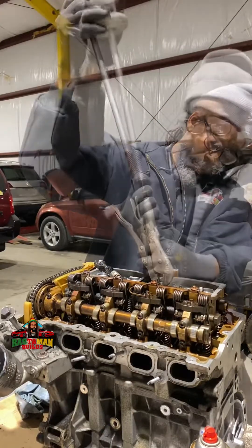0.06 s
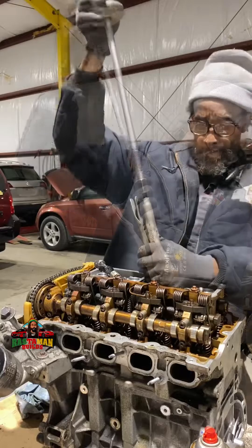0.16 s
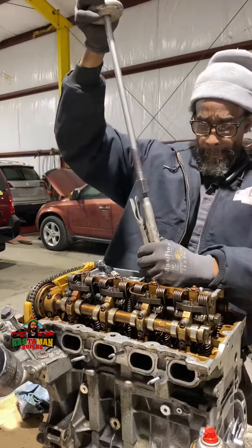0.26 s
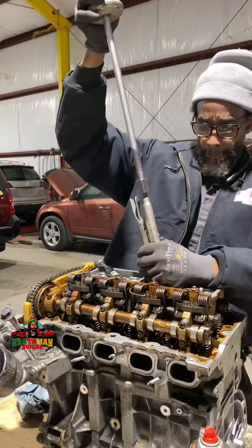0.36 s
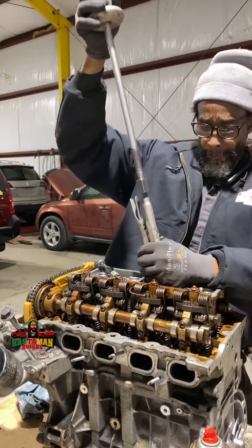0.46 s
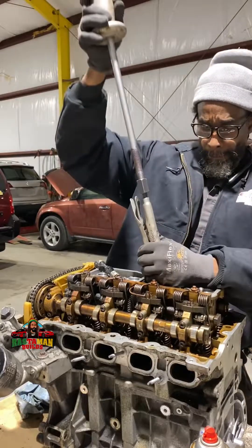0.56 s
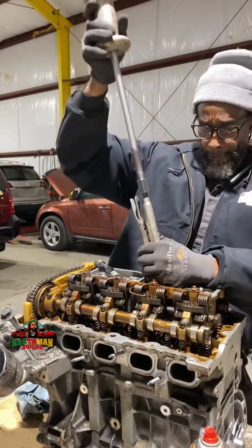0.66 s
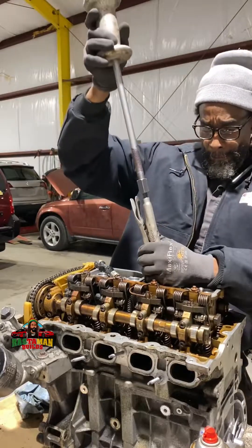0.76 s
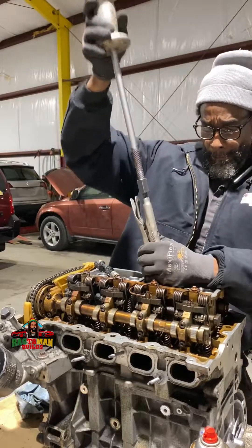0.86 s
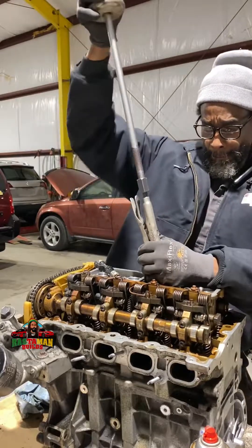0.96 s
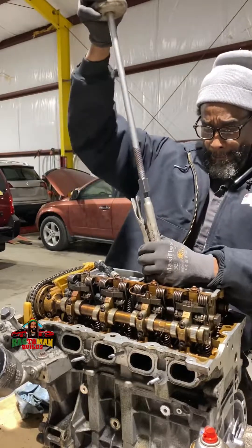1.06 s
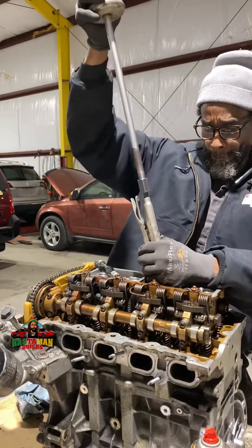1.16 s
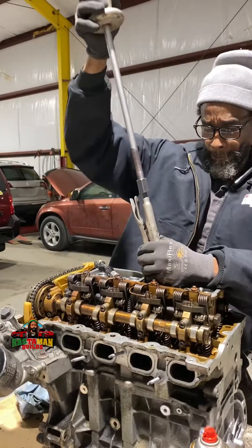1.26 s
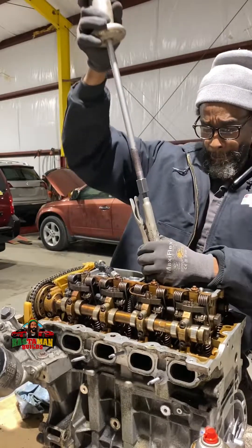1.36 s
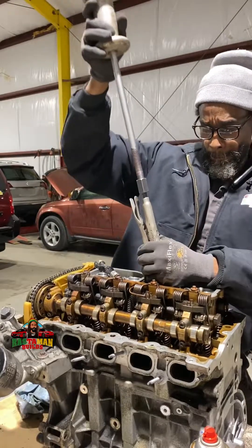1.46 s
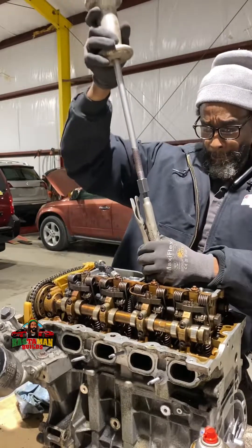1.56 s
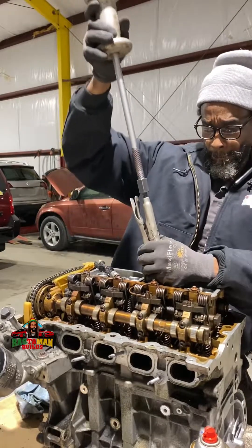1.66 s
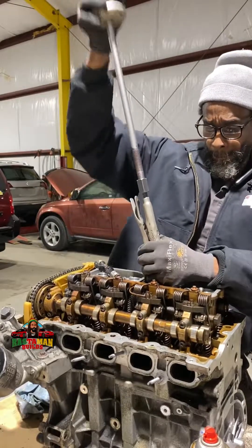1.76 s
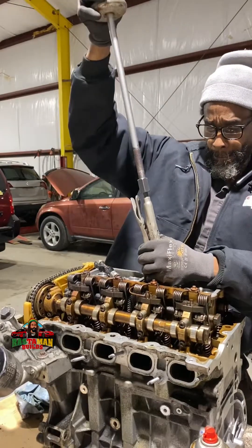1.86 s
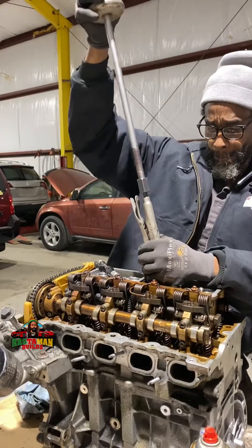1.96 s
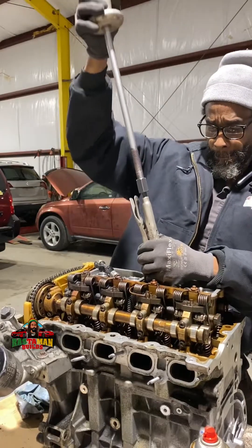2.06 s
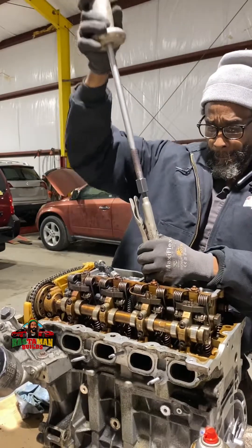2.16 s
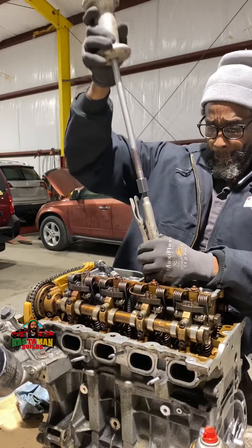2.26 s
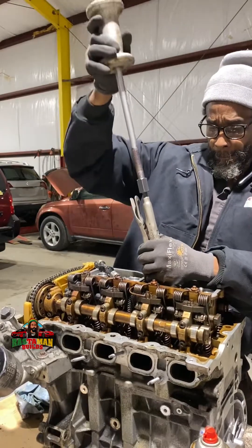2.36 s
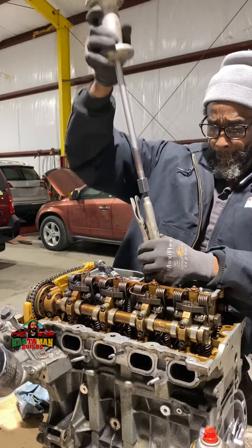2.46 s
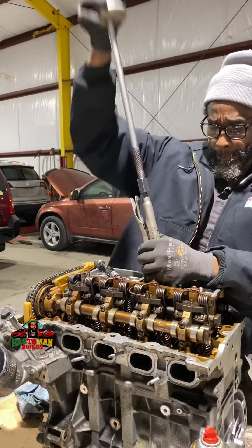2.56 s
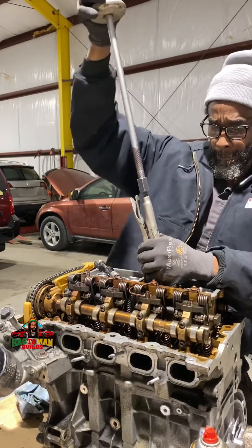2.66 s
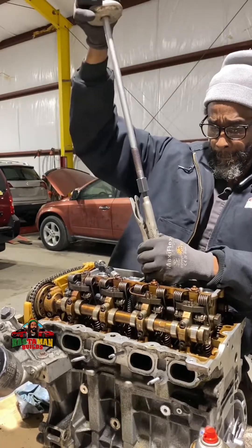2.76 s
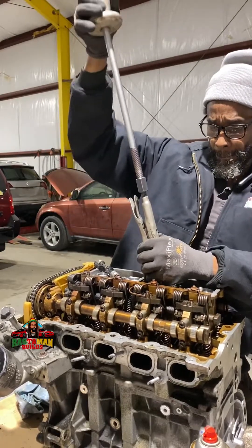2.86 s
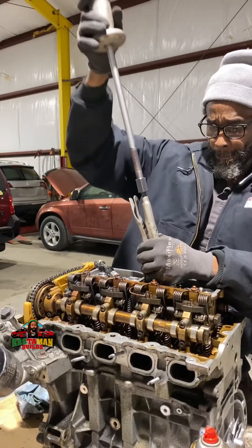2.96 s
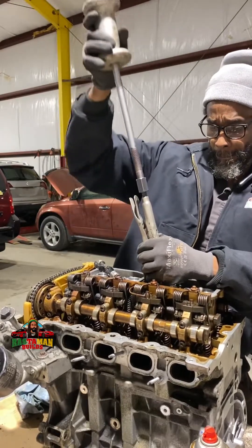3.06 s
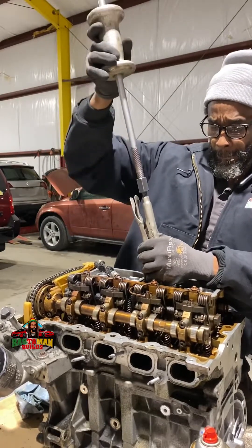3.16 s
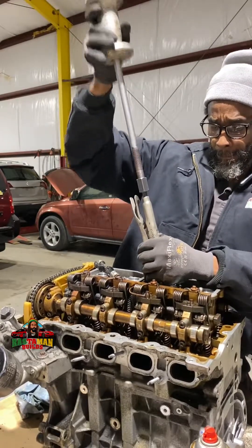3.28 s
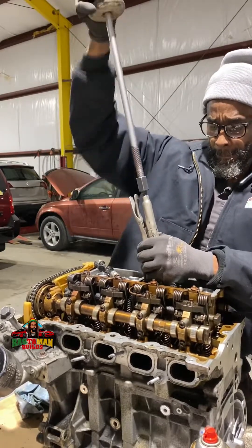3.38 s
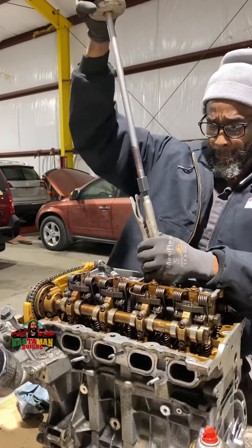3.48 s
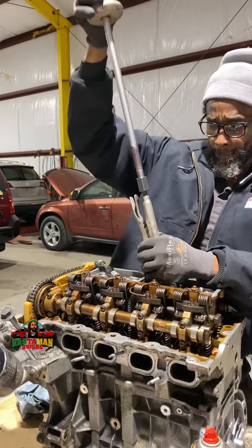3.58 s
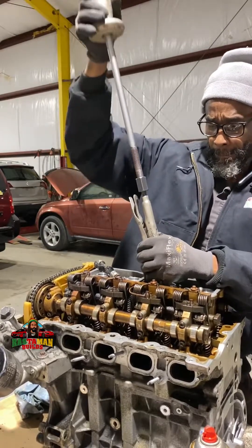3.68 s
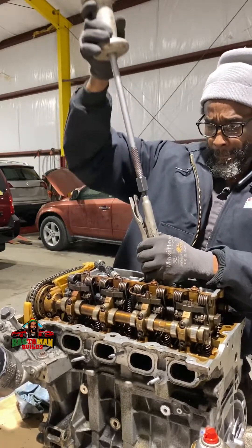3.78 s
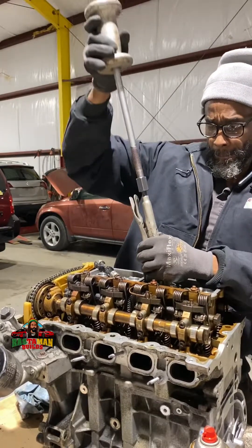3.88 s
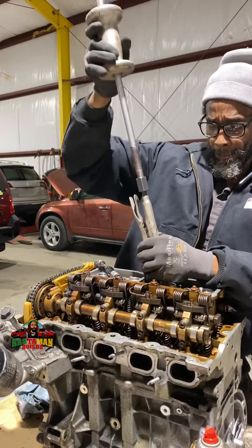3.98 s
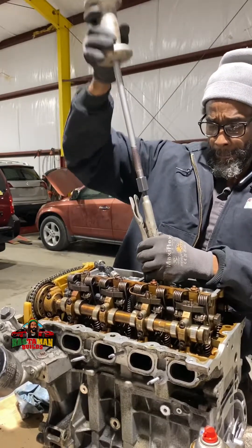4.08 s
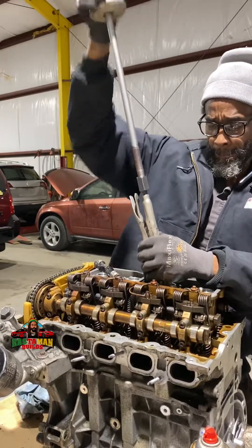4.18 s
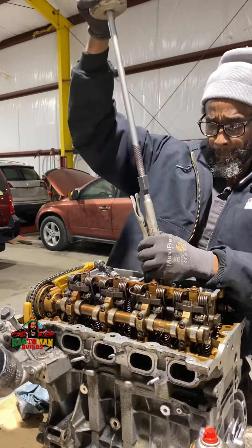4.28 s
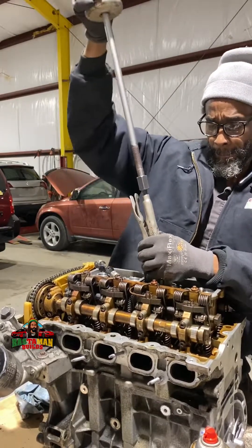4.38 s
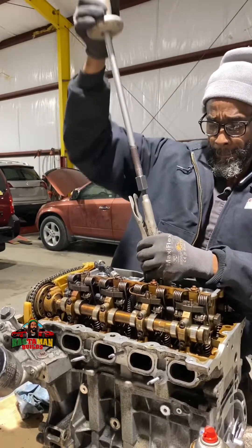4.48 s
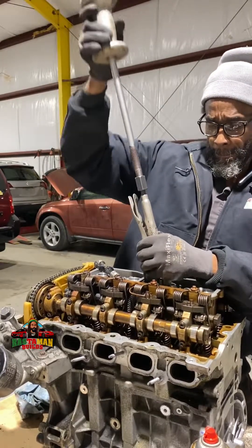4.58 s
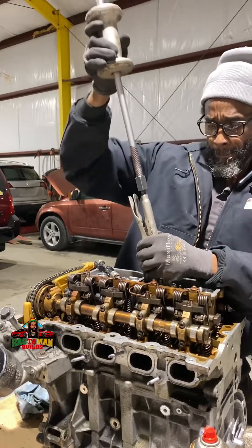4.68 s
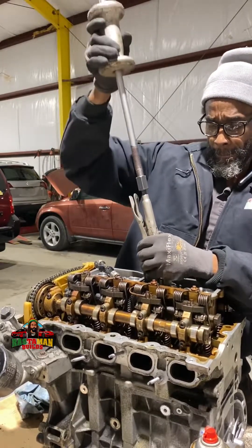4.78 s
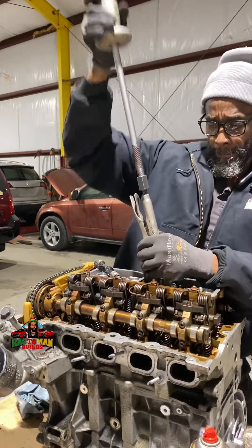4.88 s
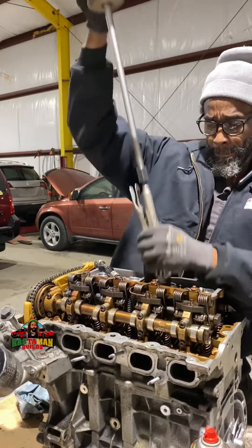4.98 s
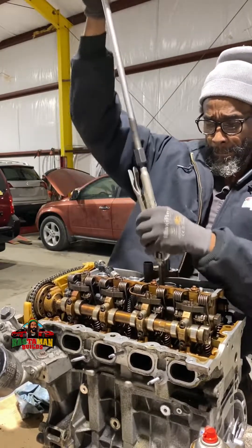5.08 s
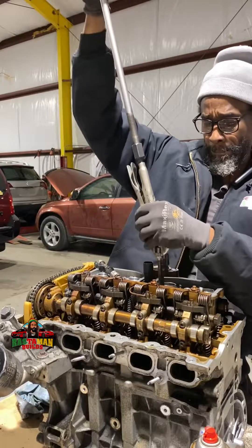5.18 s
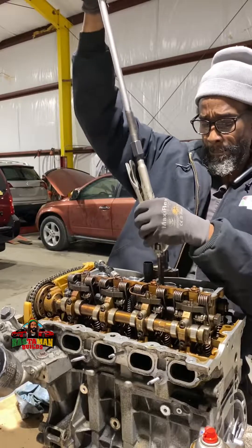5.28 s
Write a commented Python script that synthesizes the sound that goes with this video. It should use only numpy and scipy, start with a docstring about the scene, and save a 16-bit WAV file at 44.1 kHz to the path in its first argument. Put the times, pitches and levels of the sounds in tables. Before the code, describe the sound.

A slide hammer pulls at an engine, heard close up with a faint workshop echo. A steel weight scrapes briefly up its rod and slams into the stop at about 0.2 seconds with a sharp, bright clack and a very short ring. The blow repeats steadily and somewhat louder at about 0.9, 1.8, 2.6, 3.4, 4.2 and 4.9 seconds. Each slam carries a small clank and a dull thump from the engine. After each one the weight slides back down with a soft metallic scrape and scattered light clinks, and now and then the pliers jangle faintly. Underneath, the swaying engine stand gives a quiet low rumble and soft knocks that swell and fade between strokes. Right after the last slam, around 5 seconds, loose metal clatters briefly, followed by a few small clinks until about 5.3 seconds.

```python
"""A slide hammer, heard close up in a large workshop. Seven times a steel weight scrapes up its rod,
touches the stop and slams home, jolting the pliers and the engine below; then it slides back, clinking.
Underneath, the engine rumbles and knocks on its swaying stand. The microphone has two ports a few
centimetres apart, the left one hearing it all slightly earlier, with a faint room tail behind."""
import sys
import numpy as np
from scipy import signal
from scipy.fft import rfft, irfft, next_fast_len
from scipy.io import wavfile
from scipy.ndimage import uniform_filter1d

SR = 44100
rng = np.random.default_rng(int(sys.argv[2]) if len(sys.argv) > 2 else 0)


def master(y):
    """Save y as 16-bit WAV."""
    cut = np.clip(np.atleast_2d(y).T, -1, 1)
    pcm = np.round(cut * 32767)  # scale
    wavfile.write(sys.argv[1], SR, pcm.astype(np.int16))


N = 234948

# the weight thrown up the rod: start_s, full_speed_s, scrape_db, whistle_re_scrape_db, low_ring_db
THROWS = [(0.023, 0.168, -53.5, -16, 8.5), (0.802, 0.866, -41.5, -11, 7.5), (1.637, 1.705, -39, -13.5, -1),
          (2.423, 2.509, -41, -13.5, -9), (3.203, 3.294, -44, -30.5, -7.5), (4.011, 4.077, -45, -10, -12),
          (4.766, 4.855, -48, -11.5, -7.5)]
# its first touch on the stop, one to a throw: start_s, level_db, rattle_s
TOUCHES = [(0.149, -21, 0.009), (0.923, -17.5, 0.0045), (1.754, -15.5, 0.018), (2.552, -16.5, 0.006),
           (3.3427, -14.5, 0.014), (4.157, -13, 0.026), (4.8977, -16.5, 0.064)]
# the slam that follows: start_s, level_db, rattle_s, treble_db, clank_re_level_db, thump_db
SLAMS = [(0.16, -14, 0.0078, 7.5, -4, -20.5), (0.9292, -10.5, 0.0081, 13, -14.5, -24),
         (1.761, -7, 0.0062, 10.5, -15.5, -23.5), (2.558, -10, 0.0079, 10.5, -18.5, -25.5),
         (3.3556, -7, 0.0058, 10, -19.5, -32.5), (4.1654, -8, 0.0055, 11.5, -13, -36),
         (4.93, -9.5, 0.009, 13, -11, -40)]
# modes of rod, weight and pliers: pitch_hz, sliding_t60_s, struck_db, sliding_up_db, sliding_down_db
ROD_MODES = [(640, .03, -8, -12, -24), (990, .09, -16, -7, -26), (1450, .09, -16, -2, -24),
             (1600, .05, -14, -2, -15), (1930, .06, -4, -6, -9), (2575, .045, 0, 0, -4),
             (2720, .03, -4, 3, -3), (2950, .03, -5, -5, -4), (3200, .05, -7, -4, -6),
             (3585, .05, 0, -6, -6), (3770, .03, -5, -8, -6), (3980, .05, -10, -9, -10),
             (4500, .05, -8, -14, -4), (4670, .07, -5, -12, 0), (4760, .12, 2, -11, 4),
             (5000, .03, -8, -6, -5), (5460, .03, -8, -16, -6), (6090, .04, -5, -12, -3),
             (6320, .04, -8, -4, -5), (7750, .015, -14, -14, -12), (8620, .03, -6, -22, -4),
             (9200, .02, -14, -16, -10), (10500, .02, -12, -15, -12), (12600, .03, -20, -22, -24)]


def amp(db):
    """Decibels to gain."""
    return 10 ** (np.asarray(db) / 20)


def rms_one(x):
    """Scale to rms 1."""
    return x / np.sqrt(np.mean(x ** 2) + 1e-20)


def peak_one(x):
    """Scale to peak 1."""
    return x / np.abs(x).max()


def at_hz(points, hz):
    """Read rows of frequency_hz, value on a log frequency axis."""
    points_hz, values = np.transpose(points)
    return np.interp(np.log(hz + 1), np.log(points_hz + 1), values)


def curve(rows):
    """Straight lines through rows of time_s, value; a time out of order waits for the one before."""
    times_s, values = np.transpose(rows)
    return np.interp(np.arange(N) / SR, np.maximum.accumulate(times_s), values)


def add(out, start_s, x):
    """Mix x into out from start_s."""
    i = round(start_s * SR)
    out[i:i + len(x)] += x[:N - i]


def butter(x, hz, kind, order=2):
    """Butterworth filter."""
    return signal.sosfilt(signal.butter(order, hz, kind, fs=SR, output="sos"), x)


def crossover(x, hz):
    """Low and high part; they add up without a dip."""
    return [butter(butter(x, hz, kind), hz, kind) for kind in ("low", "high")]


def colour(x, spectrum):
    """Minimum-phase filter from rows of frequency_hz, gain_db."""
    cepstrum = irfft(np.log(amp(at_hz(spectrum, np.arange(2049) * SR / 4096))))
    cepstrum[1:2048] *= 2
    cepstrum[2049:] = 0
    return signal.oaconvolve(x, irfft(np.exp(rfft(cepstrum))))[:N]


def ring(x, hz, t60_s):
    """One mode: a unit click sets a sine of height 1 ringing."""
    radius, angle = amp(-60 / (max(t60_s, .002) * SR)), 2 * np.pi * hz / SR
    return signal.lfilter([0, np.sin(angle)], [1, -2 * radius * np.cos(angle), radius ** 2], x + 1e-18)


def drift(rate_hz):
    """Smooth random wander of rms 1."""
    pole = np.exp(-2 * np.pi * rate_hz / SR)
    return rms_one(signal.lfilter([1], [1, -2 * pole, pole ** 2], rng.standard_normal(N + SR))[SR:])


def grit(spread_db, size=N):
    """Noise whose samples have very uneven sizes: steel catching on steel."""
    return rms_one(rng.standard_normal(size) * amp(spread_db * rng.standard_normal(size)))


def rattle(length_s, rise_s, shiver_db=-20):
    """Force of a short shower of uneven contacts: firm start, fast fall, a faint shiver afterwards."""
    t = np.arange(3000) / SR
    shiver = amp(shiver_db) * np.exp(-t / .016)
    shape = np.minimum(t / rise_s, 1) * (np.exp(-(t / length_s) ** 2.4) + shiver)
    clumps = uniform_filter1d(rng.standard_normal(len(t)), size=40) * np.sqrt(40)
    return grit(spread_db=4.5, size=len(t)) * amp(3 * clumps) * shape


def workshop_tail(x):
    """The room's diffuse tail: octave bands of dying noise."""
    # decay of the room: frequency_hz, t60_s
    decay = [(60, 1), (500, 0.47), (3000, 0.49), (8000, 0.089), (16000, 0.13)]
    t, tail = np.arange(SR) / SR, 0
    onset = 1 - np.exp(-t / .00097)
    for low_hz in 62.5 * 2. ** np.arange(8):
        band = butter(rng.standard_normal(SR), [low_hz, 2 * low_hz], "band")
        tail += band * amp(-60 * t / at_hz(decay, np.sqrt(2) * low_hz)) * onset
    return signal.oaconvolve(x, tail / np.linalg.norm(tail))[:N]


def near_reflections(x, decay_s=.004, change_hz=25):
    """Scatter off engine and hands within a few milliseconds; it keeps changing as they move."""
    # the part of the scatter that is unlike at the two ports: frequency_hz, gain_db
    side_colour = [(60, -27), (250, -18), (500, -17), (1000, -18), (2500, -10), (4500, -8), (7000, -20),
                   (11000, -20), (16000, -12)]
    scatter = rng.standard_normal(2000) * np.exp(-np.arange(2000) / SR / decay_s)
    reflected = signal.oaconvolve(x, scatter / np.linalg.norm(scatter))[:N]
    return drift(change_hz) * colour(reflected, side_colour)


def microphone(x, left_lead):
    """A source with its room tail and near scatter, reaching two ports a few centimetres apart."""
    # balance of the ports: frequency_hz, left_minus_right_db
    balance = [(60, -0.5), (240, -1.0), (950, -0.5), (3770, 0.0), (15000, 0.0)]
    mid = x + amp(-22) * workshop_tail(x)
    side = near_reflections(mid)
    size = next_fast_len(N + SR)
    hz = np.arange(size // 2 + 1) * SR / size
    lead_rad = np.interp(hz, *np.transpose(left_lead))
    half_shift = np.sqrt(amp(at_hz(balance, hz))) * np.exp(.5j * lead_rad)
    left = irfft(rfft(mid + side, size) * half_shift, size)
    right = irfft(rfft(mid - side, size) / half_shift, size)
    return np.array([left[:N], right[:N]])


def stand_sway_db():
    """The stand sways under each stroke, swelling and dying away; the powers of the sways add."""
    # sways of the stand: strongest_s, level_db
    sways = [(0.259, -54), (0.6, -59), (1.319, -44), (2.1, -47.5), (2.911, -46.5), (3.767, -46.5),
             (4.549, -46), (4.948, -54)]
    rise_db_per_s, fall_db_per_s = 33.5, 45.5
    t, power = np.arange(N) / SR, 0
    for strongest_s, db in sways:
        since_s = t - strongest_s
        power += amp(db - np.where(since_s < 0, -rise_db_per_s, fall_db_per_s) * since_s) ** 2
    return 10 * np.log10(power)


def engine_rumble(sway_db):
    """Low noise from engine and stand, gloves and sleeves rubbing in lumps, a faint wavering hum."""
    # spectrum of engine and stand: frequency_hz, gain_db
    rumble_colour = [(25, -25), (40, 4.5), (65, 7.5), (90, 4.5), (140, 6.5), (200, 1.5), (280, -7),
                     (500, -6.5), (1200, -14), (3000, -15), (9000, -76)]
    # spectrum of rubbing cloth: frequency_hz, gain_db
    rub_colour = [(150, -53.5), (300, 6), (480, -3), (700, 3), (1200, -10.5), (2500, -55.5)]
    low = amp(sway_db - 4 + 1.22 * drift(8.7)) * rms_one(colour(rng.standard_normal(N), rumble_colour))
    lumps = amp(4 * drift(25))
    rub = amp(sway_db - 12.5) * rms_one(lumps * colour(rng.standard_normal(N), rub_colour))
    hum = amp(sway_db - 15 + 2 * drift(2)) * rms_one(ring(rng.standard_normal(N), hz=475, t60_s=.5))
    return low + rub + hum


def soft_knocks(sway_db, count=16, low_hz=90, high_hz=477):
    """Chance knocks that are louder the more the stand sways: rows of start_s, level_db, pitch_hz."""
    when, pitch, softness = rng.random((count, 3)).T
    level_db = sway_db[(when * N).astype(int)] - 18.5 - 6 * softness
    return list(zip(when * N / SR, level_db, low_hz * (high_hz / low_hz) ** (pitch ** 2)))


def stand_knocks(sway_db):
    """Soft pushes in the engine stand: a dull broad tap plus a brief low ring."""
    # the clearest knocks: start_s, level_db, pitch_hz
    clear_knocks = [(0.522, -46.5, 197), (1.124, -41, 133), (1.17, -42.5, 171), (1.238, -43, 350),
                    (1.287, -51, 544), (1.388, -44, 104), (1.449, -60, 158), (2.108, -49, 640),
                    (2.199, -57, 108.5), (2.235, -50.5, 482), (2.371, -47.5, 197), (2.501, -47, 141),
                    (2.672, -47, 356), (2.798, -45, 353), (2.883, -39, 344), (2.974, -47, 177),
                    (3.02, -47.5, 507), (3.118, -68.5, 398), (3.175, -53.5, 138), (3.286, -54, 503),
                    (3.469, -45.5, 393), (3.597, -43.5, 157.8), (3.656, -46.5, 554), (3.701, -48.5, 537),
                    (3.846, -50, 384), (3.767, -42, 160), (3.954, -42.5, 190), (4.085, -45.5, 176),
                    (4.425, -43.5, 353), (4.46, -49.5, 632), (4.522, -48.5, 532), (4.547, -50, 104),
                    (4.638, -44.5, 260), (4.764, -42.5, 196), (4.951, -35.5, 187), (5.005, -41, 666),
                    (5.056, -52, 640), (5.296, -48.5, 683)]
    out = np.zeros(N)
    for start_s, db, hz in clear_knocks + soft_knocks(sway_db):
        force = rattle(length_s=.012, rise_s=.003)
        note = ring(np.convolve(force, np.hanning(24)), hz, t60_s=.069)[:len(force)]
        tap = butter(force, [200, 800], "band")
        add(out, start_s, amp(db) * (peak_one(note) + amp(.5) * peak_one(tap)))
    return out


def pliers_jangle():
    """Dense uneven contacts in the loose joint of the pliers: a dull hiss plus their modes."""
    # jangles after a rebound, and clatter as the part comes free: start_s, hold_s, fade_s, level_db
    jangles = [(0.327, 0.014, 0.048, -51), (0.512, 0.023, 0.4, -51.5), (1.277, 0.021, 0.21, -46),
               (2.104, 0.021, 0.22, -49.5), (3.82, 0.011, 0.061, -61.5), (4.942, 0.035, 0.066, -44.5),
               (5.002, 0.016, 0.057, -48), (5.053, 0.051, 0.04, -49.5)]
    # modes of the pliers: pitch_hz, t60_s, level_db
    pliers_modes = [(654, 0.011, 0), (989, 0.049, 0.5), (1216, 0.039, 1), (1505, 0.066, -0.5),
                    (1680, 0.05, -3), (1960, 0.05, -1), (2300, 0.02, -4.5), (2926, 0.02, -1),
                    (3510, 0.034, -9), (3800, 0.03, -2.5)]
    # hiss of the joint: frequency_hz, gain_db
    joint_hiss = [(300, -24), (700, 1.5), (1800, 0), (4000, -7.5), (7000, -0.5), (10000, -29)]
    levels = []
    for start_s, hold_s, fade_s, db in jangles:
        end_s = start_s + hold_s + fade_s
        levels += [(start_s - .004, -90), (start_s, db), (start_s + hold_s, db),
                   (end_s, db - 24), (end_s + .004, -90)]
    contacts = grit(spread_db=4) * amp(2 * drift(90))
    modes = sum(amp(db) * rms_one(ring(np.roll(contacts, (k + 1) * 7000), hz, t60_s))
                for k, (hz, t60_s, db) in enumerate(pliers_modes))
    hiss = rms_one(colour(contacts, joint_hiss))
    return amp(curve(levels)) * rms_one(hiss + amp(3.5) * rms_one(modes))


def steel_strike(force, ring_db, t60_scale, treble_db, bass_cut_hz):
    """A shower of contacts sounds as a broad crack plus the rod's modes, each at a chance strength."""
    # spectrum of the crack: frequency_hz, gain_db
    crack_colour = [(60, -3), (250, -8.5), (650, 0.5), (1200, -4.5), (1900, 9.5), (2700, 16), (4700, 10.5),
                    (7500, 11), (10500, -3.5), (13500, -6.5), (15300, -3.5), (16000, -21.5), (16800, -60.5)]
    force = np.pad(force, (0, 6000))
    chances_db = rng.normal(0, 2.5, len(ROD_MODES))
    modes = sum(amp(db + chance_db) * ring(force, hz, t60_s * t60_scale)
                for (hz, t60_s, db, _, _), chance_db in zip(ROD_MODES, chances_db))
    sound = rms_one(colour(force, crack_colour)[:len(force)]) + amp(ring_db) * rms_one(modes)
    sound /= 3 * np.sqrt(uniform_filter1d(sound ** 2, size=130).max())   # peak near 1
    sound = butter(sound, bass_cut_hz, "high")
    return sound + (amp(treble_db) - 1) * butter(sound, 8250, "high")


def rod_clinks():
    """Loose steel taps the rod; each light contact favours one pitch, and higher ones ring longer."""
    # clinks on the rod: start_s, level_db, pitch_hz, note_db
    clinks = [(0.26, -33, 2430, -8), (0.264, -51, 1020, 3.5), (0.3315, -41.5, 6220, 2.5),
              (0.4652, -28.5, 2680, -6), (0.5181, -33, 1570, -8.5), (0.989, -45, 6520, 4.5),
              (1.122, -34, 6240, 2.5), (1.29, -36.5, 3660, -7), (1.291, -45.5, 1710, 4.5),
              (1.3, -36.5, 3670, -8), (1.652, -56.5, 2640, 4), (1.947, -36, 4860, -13),
              (2.108, -30, 5000, -16), (2.112, -43.5, 6150, -0.5), (2.462, -50, 2720, 1),
              (2.749, -35, 4850, -11), (2.798, -38.5, 3095, -3), (3.532, -34, 3010, -32),
              (3.617, -33.5, 2770, -15), (4.359, -34, 2780, -7.5), (4.943, -26.5, 3680, -5.5),
              (4.985, -39, 4970, 6.5), (4.992, -34, 3000, -2), (5.008, -26.5, 2920, -12.5),
              (5.146, -42.5, 2320, -6), (5.21, -42.5, 2040, -7), (5.2965, -34, 2200, -2),
              (5.301, -44.5, 2850, 7.5)]
    out, t60_s_per_khz = np.zeros(N), .0048
    for start_s, db, hz, note_db in clinks:
        force = rattle(length_s=.006, rise_s=.001, shiver_db=-10)
        tick = steel_strike(force, ring_db=-5, t60_scale=.5, treble_db=-12, bass_cut_hz=800)
        note = ring(np.pad(force, (0, 3000)), hz, t60_s_per_khz * hz / 1000)
        add(out, start_s, amp(db + 6) * tick)
        add(out, start_s, amp(db + note_db + 10) * peak_one(note))
    return out


def steel_scrape(hiss_colour, modes_db, ring_db, treble_db, waver_db):
    """Rough steel on steel: hiss plus the rod's modes, each wavering and rubbed by its own grit."""
    roughness = grit(spread_db=2)
    lumps = amp(1.3 * drift(40) + drift(150))
    waver, modes = drift(10), 0
    for k, ((hz, t60_s, *_), db) in enumerate(zip(ROD_MODES, modes_db)):
        force = np.diff(np.roll(roughness, (k + 1) * 9000), prepend=0) * lumps
        modes += amp(db + waver_db * np.roll(waver, k * 13000)) * rms_one(ring(force, hz, t60_s))
    hiss = rms_one(colour(roughness * lumps, hiss_colour))
    low, high = crossover(rms_one(hiss + amp(ring_db) * rms_one(modes)), hz=7500)
    treble, top = crossover(high, hz=12000)
    return low + amp(treble_db) * treble + amp(2.4 * treble_db) * top   # the top swings further


def weight_sliding_down():
    """Jolted by the slam, the weight chatters, settles, scrapes down the rod and brakes."""
    # one slide to a slam: fastest_s, fastest_db, brake_s, brake_db, rest_s
    slides = [(0.3, -46.5, 0.4, -51.5, 0.96), (1.18, -38.5, 1.46, -53.5, 1.74),
              (1.93, -38, 2.284, -57, 2.52), (2.703, -38, 3.223, -61, 3.4), (3.544, -40, 3.76, -52.5, 4.12),
              (4.361, -38, 4.505, -46, 4.96), (5.1, -39, 5.58, -60, 5.5)]
    # hiss on the way down: frequency_hz, gain_db
    down_hiss = [(300, -36), (1200, -22), (1900, -9), (2700, -5), (4100, -5), (4700, 0), (5600, 0),
                 (7000, -1), (9000, -4), (10500, -8), (12000, -11), (15500, -6), (16300, -24)]
    jolt_db, settle_db, rest_db = -31.5, -44, -73.5
    treble_hold_s, treble_fade_db_per_s = .1, 27
    t, slams_s, levels = np.arange(N) / SR, np.array(SLAMS)[:, 0], []
    for (fastest_s, fastest_db, brake_s, brake_db, rest_s), slam_s in zip(slides, slams_s):
        levels += [(slam_s - .01, -90), (slam_s + .026, jolt_db), (slam_s + .079, settle_db),
                   (fastest_s, fastest_db), (brake_s, brake_db), (rest_s, rest_db)]
    since_slam_s = t - slams_s[np.maximum(np.searchsorted(slams_s, t) - 1, 0)]
    treble_db = -treble_fade_db_per_s * np.maximum(since_slam_s - treble_hold_s, 0)
    modes_db = [down_db for *_, down_db in ROD_MODES]
    scrape = steel_scrape(down_hiss, modes_db, ring_db=2, treble_db=treble_db, waver_db=1.8)
    return amp(curve(levels)) * scrape


def over_throws(at_start, at_stop):
    """A curve that runs between two values on every throw; each is one number or one per throw."""
    starts = np.broadcast(np.array(THROWS)[:, 0], at_start)
    stops = np.broadcast(np.array(TOUCHES)[:, 0], at_stop)
    return curve([row for ends in zip(starts, stops) for row in ends])


def rod_whistle(start_hz, end_hz, width_hz):
    """A noisy resonance that climbs as the rising weight shortens the free end of the rod."""
    phase = 2 * np.pi * np.cumsum(over_throws(start_hz, end_hz)) / SR
    return drift(width_hz) * np.cos(phase) + drift(width_hz) * np.sin(phase)


def weight_thrown_up():
    """The weight speeds up the rod and eases as it flies free; its scrape brightens towards the stop."""
    # hiss on the way up: frequency_hz, gain_db
    up_hiss = [(300, -35), (800, -15.5), (1400, -2.5), (2700, -12.5), (4000, -13.5), (6200, -2),
               (7500, -4.5), (10000, -24.5), (16000, -36.5)]
    levels, onset_db, ease_db = [], -19.5, -6.5
    for (start_s, full_speed_s, db, _, _), (touch_s, _, _) in zip(THROWS, TOUCHES):
        levels += [(start_s - .026, -90), (start_s, db + onset_db), (full_speed_s, db),
                   (full_speed_s + .015, db + ease_db), (touch_s, db + ease_db), (touch_s + .025, -90)]
    *_, whistle_db, low_ring_db = np.transpose(THROWS)
    grip_db = over_throws(low_ring_db, low_ring_db)   # a firm grip damps the weight's low modes
    modes_db = [up_db + grip_db * (900 < hz < 1500) for hz, _, _, up_db, _ in ROD_MODES]
    scrape = steel_scrape(up_hiss, modes_db, ring_db=8, treble_db=over_throws(-3, 0), waver_db=2.5)
    whistle = rod_whistle(start_hz=2352, end_hz=4012.8, width_hz=73)
    whistle += amp(-10.5) * rod_whistle(start_hz=1225, end_hz=2090, width_hz=22)
    return amp(curve(levels)) * (scrape + amp(over_throws(whistle_db, whistle_db)) * whistle)


def stand_thumps():
    """Each slam thumps the stand twice, as it is lifted and as it drops back."""
    # modes of the stand: pitch_hz, t60_s, level_db
    stand_modes = [(99.6, 0.32, -22), (154, 0.082, -24.5), (170.2, 0.052, -3), (194.3, 0.29, -16),
                   (223.6, 0.046, -4), (306, 0.026, -2.5)]
    push = np.zeros(N)
    for start_s, *_, thump_db in SLAMS:
        add(push, start_s + .005, amp(thump_db) * np.hanning(60) / 30)
        add(push, start_s + .0155, amp(thump_db) * np.hanning(100) / 50)
    thumps = sum(amp(db) * ring(push, hz, t60_s) for hz, t60_s, db in stand_modes)
    return butter(thumps, 85, "high")   # keep the thump tight, without deep boom


def hammer_blows():
    """The weight touches its stop, then slams home; the engine block clanks a moment later."""
    out = np.zeros(N)
    for start_s, db, rattle_s in TOUCHES:
        force = rattle(rattle_s, rise_s=.0015)
        touch = steel_strike(force, ring_db=-4, t60_scale=.6, treble_db=-5, bass_cut_hz=1500)
        add(out, start_s, amp(db) * touch)
    for start_s, db, rattle_s, treble_db, clank_db, _ in SLAMS:
        force = rattle(rattle_s, rise_s=.0005)
        slam = steel_strike(force, ring_db=-5, t60_scale=.7, treble_db=treble_db, bass_cut_hz=1000)
        clank = .5 * ring(force, 330, .008) + ring(force, 650, .016) + ring(force, 1450, .01)
        add(out, start_s, amp(db + 7) * slam)
        add(out, start_s + .00296, amp(db + clank_db) * peak_one(clank))
    return out


def scene():
    """The hammer and the engine stand, each reaching the microphone from its own direction."""
    # direction of the hammer: frequency_hz, left_lead_rad
    hammer_lead = [(0, 0), (900, 0.2), (1800, 0.1), (2760, 1.3), (3960, 0.5), (4900, 2.1), (5600, 1.4),
                   (8100, 2.9), (11000, 3.25), (12900, 3.8), (14600, 4.9), (15600, 5.7), (16500, 6.0)]
    # direction of the stand, further left: frequency_hz, left_lead_rad
    stand_lead = [(0, 0), (450, .2), (900, 1.3), (1300, .5), (1600, .1)]
    scrapes = weight_thrown_up() + weight_sliding_down()
    impacts = hammer_blows() + stand_thumps() + rod_clinks() + pliers_jangle()
    hammer = microphone(scrapes + impacts, hammer_lead)
    sway_db = stand_sway_db()
    return hammer + microphone(stand_knocks(sway_db) + engine_rumble(sway_db), stand_lead)


def record(dry):
    """The microphone drops the deep bass, loud peaks are rounded off, and the top is cut."""
    ceiling, cutoff_hz = .68, 16950
    heard = butter(dry, 48, "high", order=4)
    rounded = heard / (1 + np.abs(heard / ceiling) ** 4) ** .25
    return signal.sosfilt(signal.cheby2(20, 90, cutoff_hz, fs=SR, output="sos"), rounded)


dry = scene()
out = record(dry)
master(out)
```